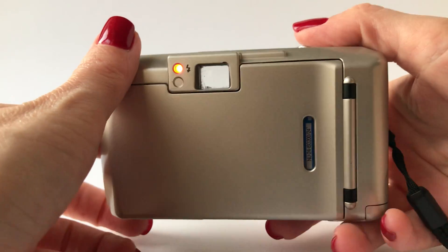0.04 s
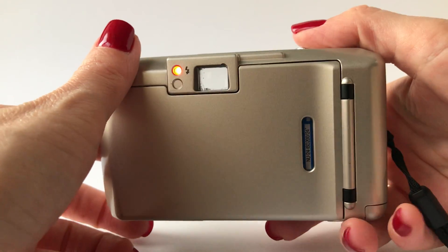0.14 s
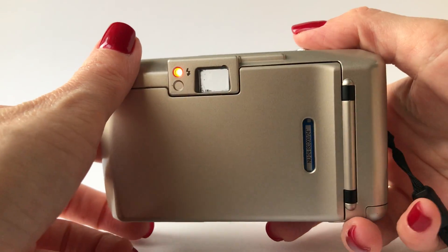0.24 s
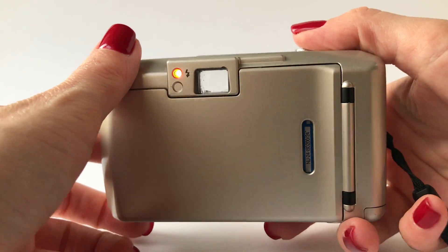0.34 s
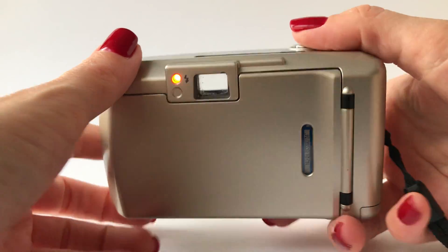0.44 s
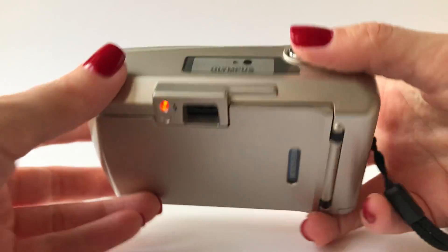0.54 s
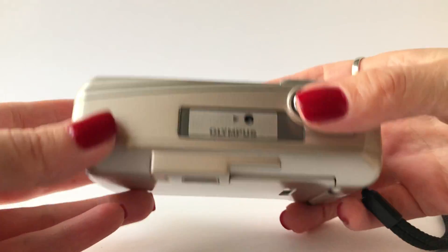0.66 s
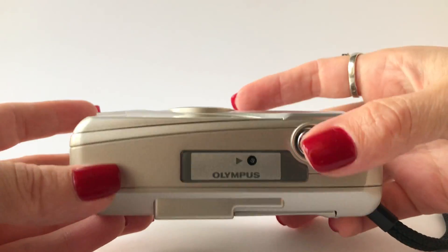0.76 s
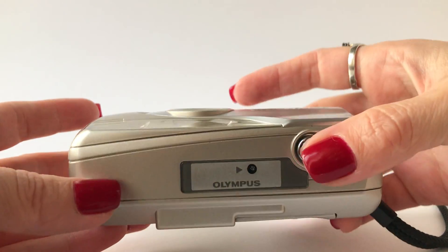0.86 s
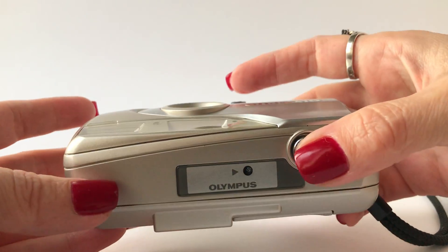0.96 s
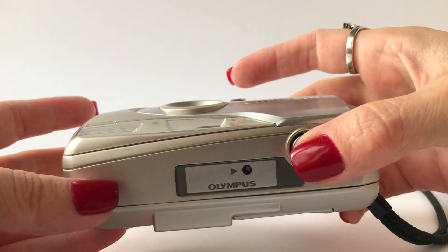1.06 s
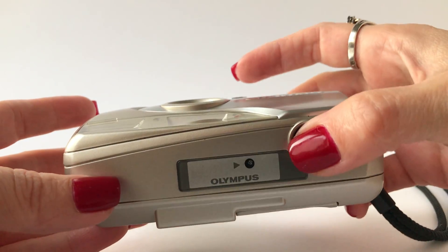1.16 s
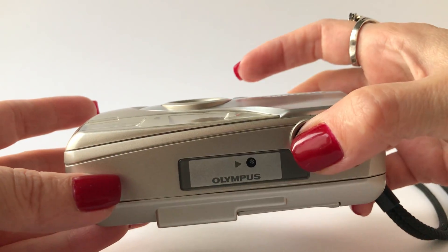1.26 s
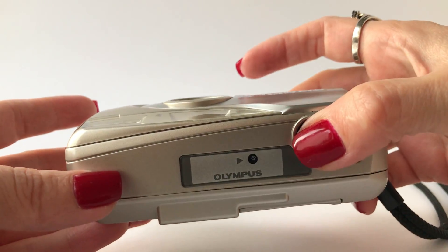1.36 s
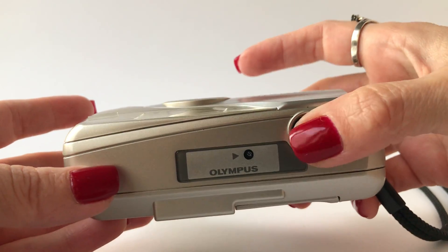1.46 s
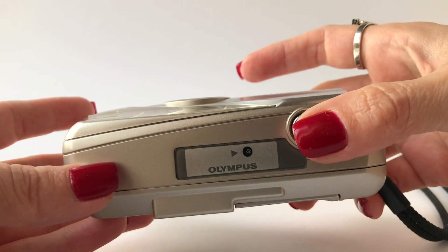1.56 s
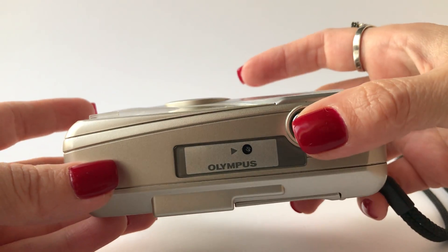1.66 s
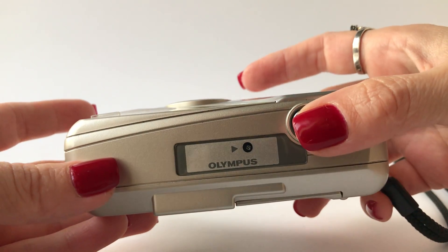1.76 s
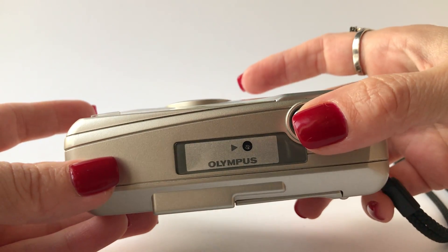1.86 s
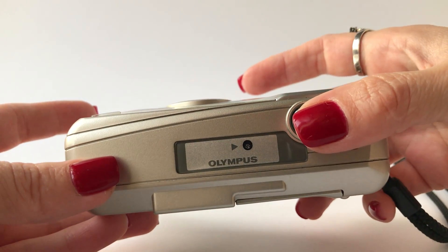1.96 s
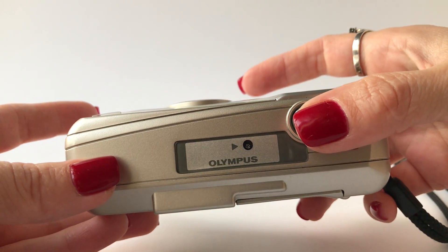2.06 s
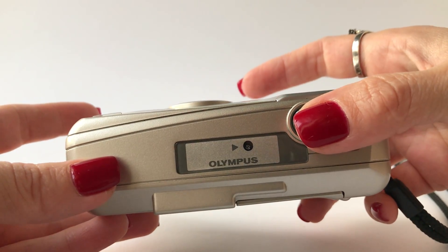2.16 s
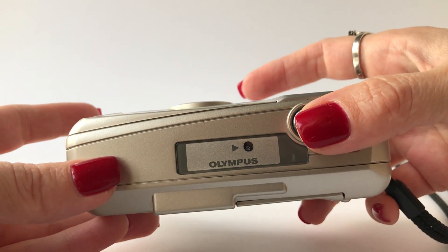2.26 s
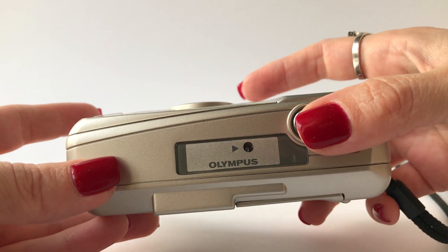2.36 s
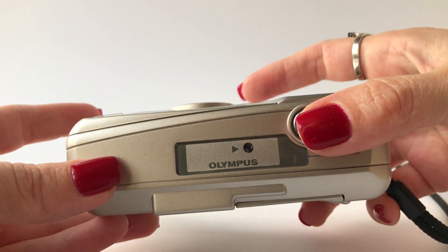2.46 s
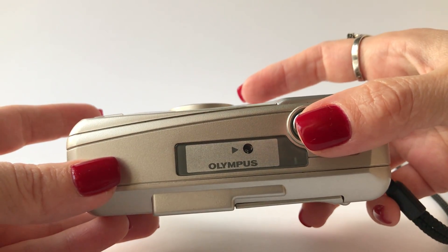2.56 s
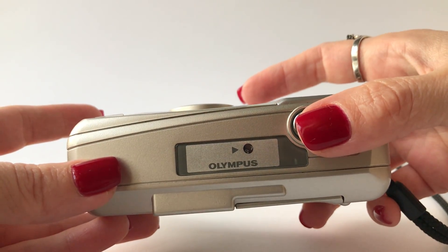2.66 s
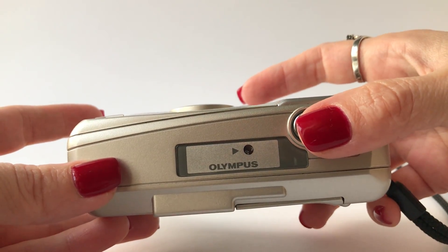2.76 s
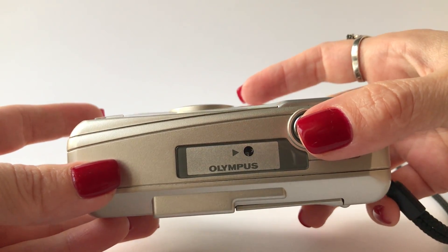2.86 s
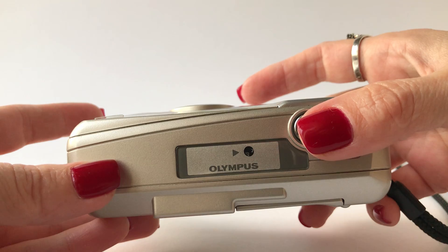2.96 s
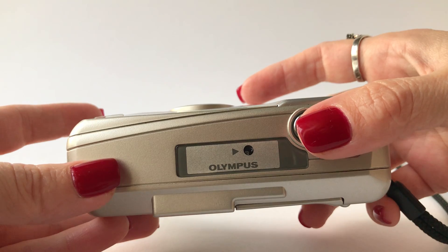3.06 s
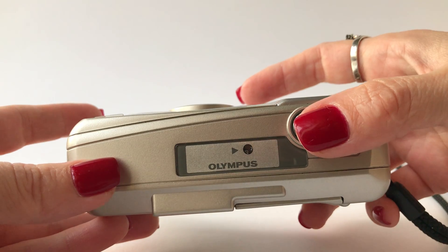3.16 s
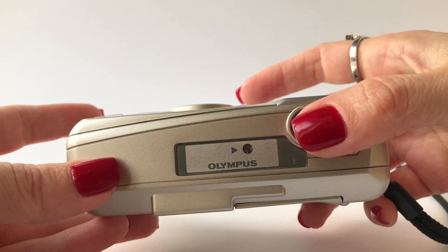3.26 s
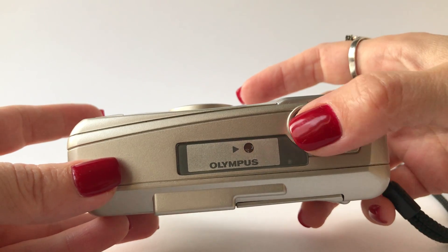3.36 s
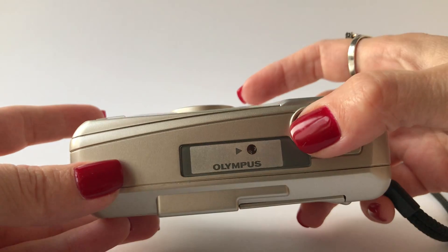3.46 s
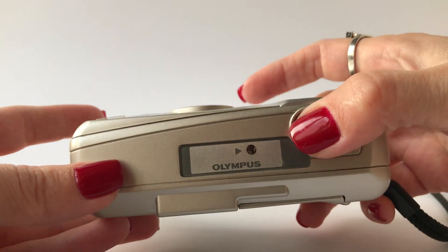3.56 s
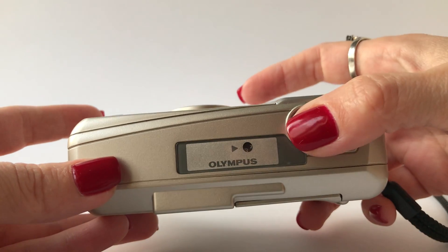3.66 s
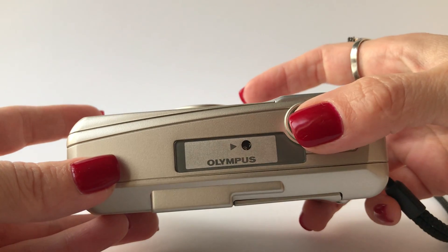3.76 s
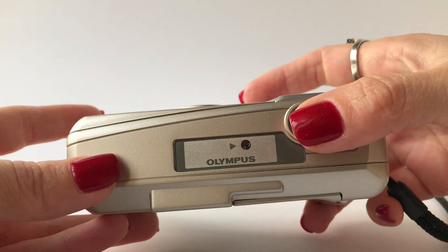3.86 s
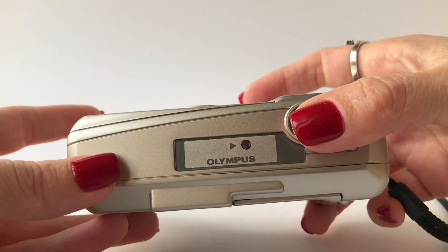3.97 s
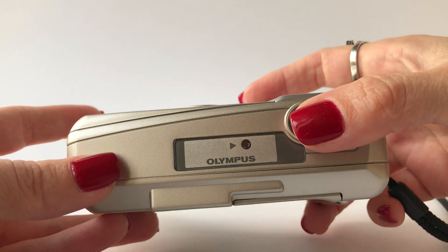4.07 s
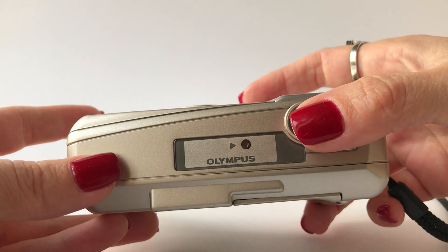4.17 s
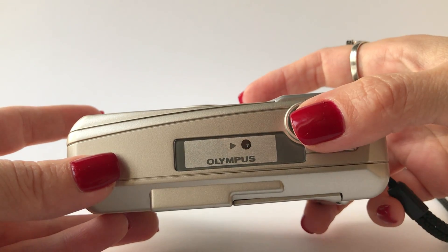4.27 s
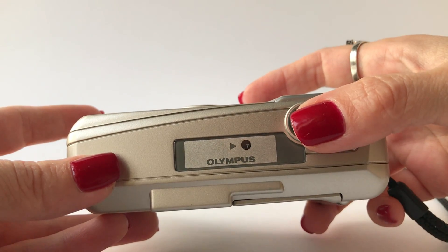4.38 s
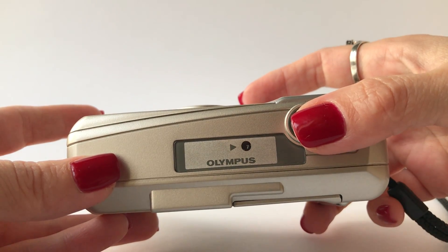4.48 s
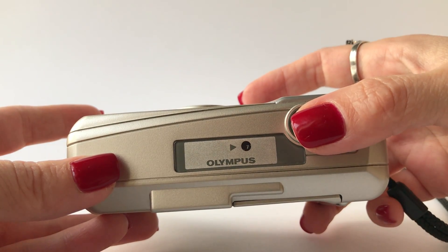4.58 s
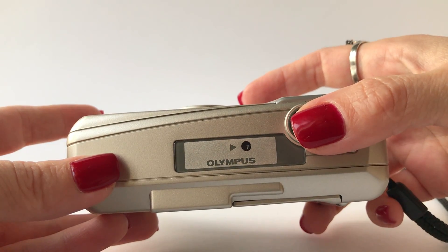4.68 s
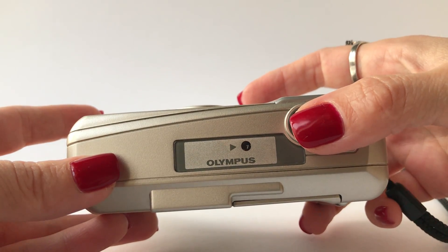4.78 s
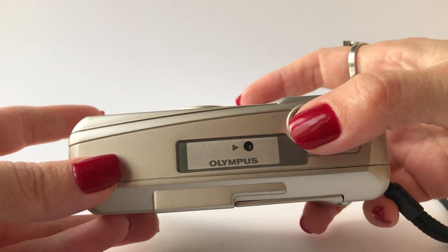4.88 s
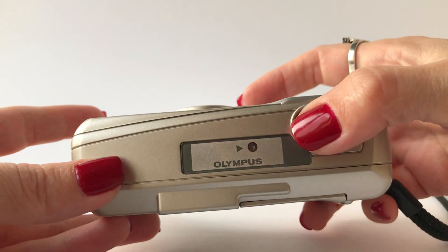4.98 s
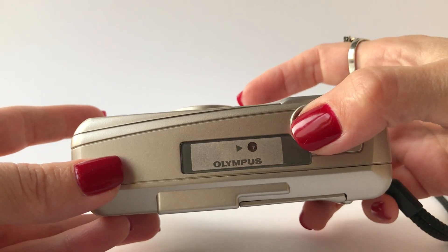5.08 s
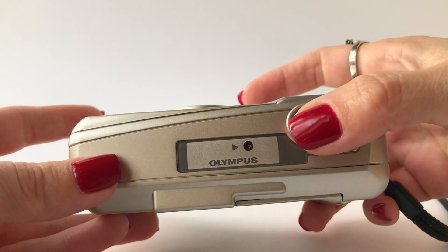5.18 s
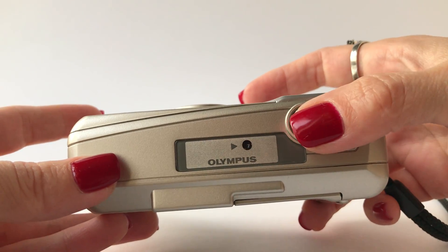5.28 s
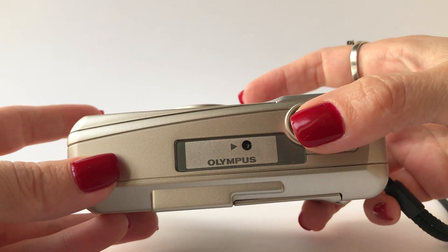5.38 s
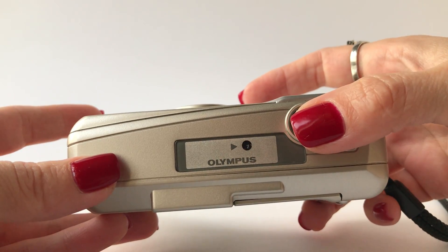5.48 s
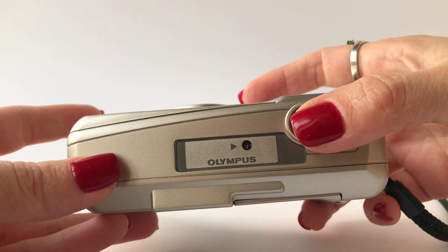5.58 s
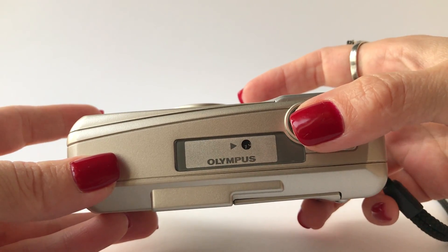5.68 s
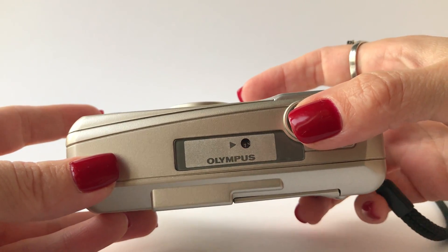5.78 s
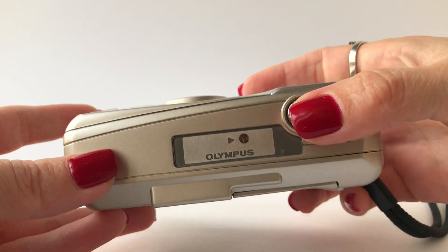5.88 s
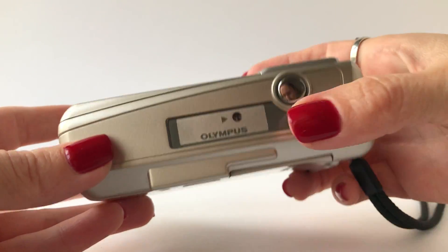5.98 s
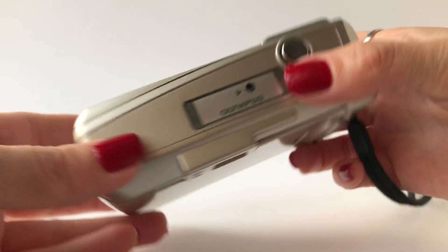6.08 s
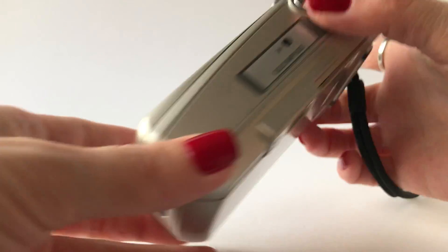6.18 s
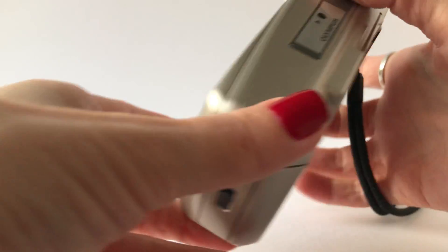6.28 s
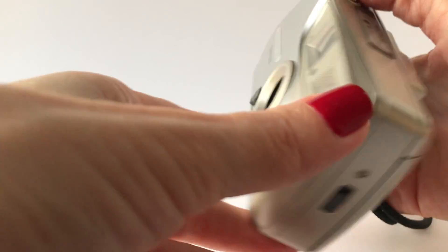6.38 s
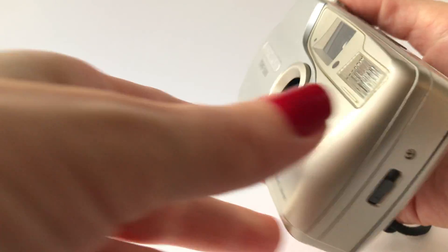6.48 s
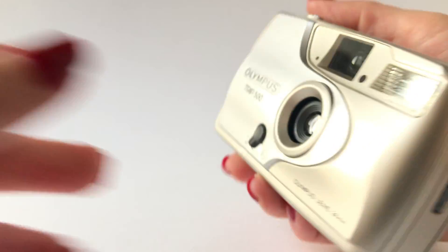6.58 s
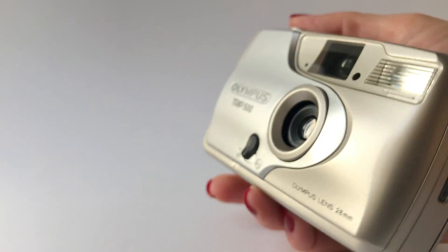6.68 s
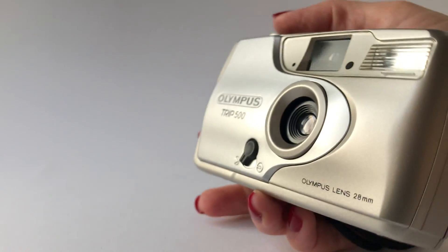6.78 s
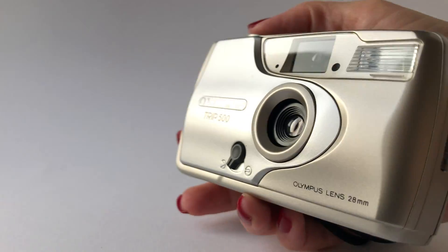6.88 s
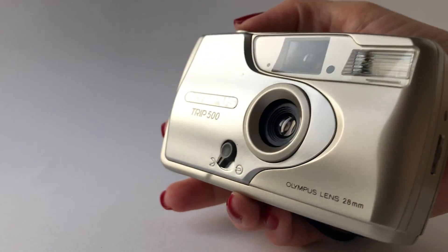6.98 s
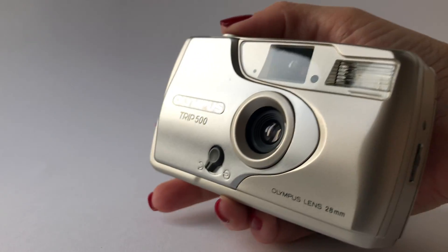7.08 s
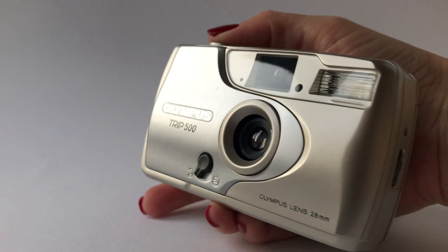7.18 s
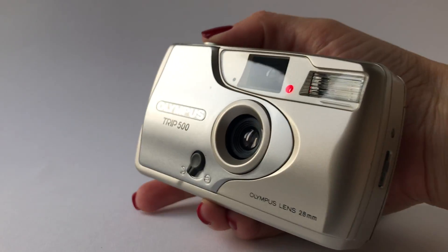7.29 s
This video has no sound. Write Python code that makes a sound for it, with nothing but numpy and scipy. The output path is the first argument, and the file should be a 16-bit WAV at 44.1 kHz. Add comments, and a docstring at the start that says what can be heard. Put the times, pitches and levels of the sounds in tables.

```python
"""In a small, quiet room, a compact film camera held close to the microphone is fired twice.
Shutter, pawls and film strike the plastic shell: modes ring under short bursts of contact noise.
A geared motor winds in three runs: shaft harmonics, a tooth-mesh tone and rattling noise.
A rising sine is the flash recharging; shaped noise is fingers sliding and tapping on the shell.
Behind it lie filtered air noise, the beating low drone of an appliance and faint treble ticks."""
import sys
import numpy as np
from scipy import signal
from scipy.fft import rfft, irfft
from scipy.io import wavfile
from scipy.ndimage import uniform_filter1d

SR = 44100
rng = np.random.default_rng(int(sys.argv[2]) if len(sys.argv) > 2 else 0)


def int16_out(signal):
    """Quantize to a 16-bit WAV file."""
    q = np.round(np.clip(np.atleast_2d(signal).T, -1, 1) * 32767)
    wavfile.write(sys.argv[1], SR, q.astype(np.int16))


N = 323694
TIME = np.arange(N) / SR

# The motor winds the film. Each row: start in seconds, stop in seconds, free shaft speed in Hz,
# stretch of the closing sequence (factor), extra metal snap of that sequence in dB.
WINDING_RUNS = [(1.632, 2.647, 239.9, 1.044, 0), (3.848, 4.4045, 237.9, 1.0, 0),
                (5.339, 5.879, 240.3, 0.96, 0)]
# Colour of the dull rustle and of the faint hiss. Each row: frequency in Hz, relative level in dB.
RUSTLE_COLOUR = [(600, -8), (1500, -1.5), (4400, -6.5), (6500, -14.5), (16000, -8.5)]


def undb(db):
    """Turn decibels into gain."""
    return 10 ** (np.asarray(db) / 20)


def unit(x):
    """Scale to rms 1."""
    return x / np.sqrt(np.mean(x ** 2))


def add(out, s, x):
    """Mix x into out from s seconds on."""
    i = max(int(s * SR), 0)
    out[i:i + len(x)] += x[:N - i]


def band(x, lo_hz, hi_hz):
    """Causal band-pass."""
    return signal.sosfilt(signal.butter(3, [lo_hz, hi_hz], "band", fs=SR, output="sos"), x)


def colour(x, points):
    """Filter by an outline of (Hz, dB) points, then scale to rms 1."""
    hz, db = np.transpose(points)
    f = np.maximum(np.fft.rfftfreq(len(x), 1 / SR), 1)
    outline_db = np.interp(np.log(f), np.log(hz), db)
    return unit(irfft(rfft(x) * undb(outline_db), len(x)))


def walk(rate_hz, size=N):
    """Smooth random wandering of rms about 1, with a new random target at the given rate."""
    hold = max(int(SR / rate_hz), 1)
    steps = np.repeat(rng.standard_normal(size // hold + 1), hold)
    return unit(uniform_filter1d(steps, hold)[:size])


def gate(full, stop, rise, fall):
    """Ramp up over rise seconds to full level at time full, then die away after stop."""
    return np.clip((TIME - full) / rise + 1, 0, 1) * np.exp(-np.maximum(TIME - stop, 0) / fall)


def swell(s, rise, fall):
    """A smooth hump of height 1 at time s."""
    return np.exp(-.5 * ((TIME - s) / np.where(TIME < s, rise, fall)) ** 2)


def strike(lo_hz, hi_hz, contact_s, crack_db, rise_s, sheen=0.0):
    """One register of a blow: body modes ring, the contact chatters and leaves a faint diffuse tail."""
    # Modes of the shell and its levers. Each row: frequency in Hz, relative level in dB, t60 in seconds.
    body_modes = [(599, 1, 0.055), (694, 0, 0.034), (790, -5, 0.0071), (885, -4.5, 0.07), (982, -3, 0.054),
                  (1285, -4, 0.032), (1313, -5, 0.032), (1630, -5.5, 0.023), (1780, -7.5, 0.023),
                  (2205, -1.5, 0.019), (2414, -2.5, 0.021), (2750, -2, 0.024), (3084, -3.5, 0.028),
                  (3854, -2.5, 0.022), (5820, -2, 0.022), (7700, -1, 0.014), (8650, 0, 0.017),
                  (11080, -5, .01), (13500, -8.5, .008), (15500, -2, .008)]
    scatter_db, tail_db, tail_s = -1.0, -32, 0.028
    t = np.arange(SR // 5) / SR
    hz, db, t60 = np.transpose(body_modes)[:, :, None]
    detune, size, angle = rng.standard_normal((len(body_modes), 3)).T[:, :, None]
    inside = 1 / (1 + (lo_hz / hz) ** 8 + (hz / hi_hz) ** 8)
    rings = np.sin(2 * np.pi * (hz * (1 + 0.013 * detune) * t + angle)) * np.exp(-np.log(1000) * t / t60)
    modes = np.sum(inside * undb(db + scatter_db * size) * rings, axis=0)
    decay = np.exp(-t / contact_s) + undb(tail_db) * np.exp(-t / tail_s)
    chatter = rng.standard_normal(len(t)) * decay
    crack = band(chatter - sheen * np.roll(chatter, 1), lo_hz, hi_hz)  # harder edges favour the top
    onset = 1 - np.exp(-(t / rise_s) ** 2)
    blow = (unit(modes) + undb(crack_db) * unit(crack)) * onset
    return blow / np.sqrt(np.sum(blow ** 2) / (SR / 1000))  # energy of 1 ms at full scale


def clicks(blows, thud_db, ring_db, snap_db, crack_db, rise_s, thud_hz, ring_hz, sheen):
    """Sprung levers hit their stops: the shell thuds, the levers ring, the metal edges snap."""
    out = np.zeros(N)
    for s, db, thud, snap, contact_s in blows:
        blow = undb(thud + thud_db) * strike(*thud_hz, contact_s, crack_db=-7.5, rise_s=rise_s)
        blow += undb(ring_db) * strike(*ring_hz, contact_s, crack_db, rise_s)
        blow += undb(snap + snap_db) * strike(3500, 17000, contact_s, crack_db=11, rise_s=rise_s, sheen=sheen)
        add(out, s, undb(db) * blow)
    return out


def shutter():
    """At each shot the latch trips and the sprung blades open, bounce, close and rebound."""
    # Each row: time in seconds, level in dB, extra shell thud in dB, extra metal snap in dB.
    shots = [(3.5181, 0, 2, 0), (5.0264, -0.5, -2, 1)]
    # Latch, blades opening, two bounces, blades closing, rebound. Each row: time relative to the shot
    # in seconds (negative is before it), blow level in dB, relative shell thud in dB,
    # relative metal snap in dB, contact decay in seconds.
    blade_blows = [(-.0013, -30, -20, -12.5, 0.001), (0, -10, -24.5, -12.5, 0.0014),
                   (.0028, -25, -16, -3, .002), (.0058, -24, -6.5, -2, 0.0038),
                   (0.0119, -17, -14, -2, .0017), (.025, -21.5, -18, -3, .0024)]
    blows = [(s + offset, db + level, thud + more_thud, snap + more_snap, contact_s)
             for s, db, more_thud, more_snap in shots
             for offset, level, thud, snap, contact_s in blade_blows]
    return clicks(blows, thud_db=-2.0, ring_db=-5.5, snap_db=-1, crack_db=6.5, rise_s=.0006,
                  thud_hz=(659, 1298), ring_hz=(1530, 2884), sheen=0.098)


def shaft_speed(start, stop, free_hz):
    """Turns per second: the motor spins up, follows the pull of the film and sags under the cocking spring."""
    # The film runs slack or drags. Each row: time in seconds, rise in seconds, fall in seconds,
    # change of shaft speed in Hz.
    film_pull = [(1.809, .07, .035, 15), (2.19, .095, .055, -11.5)]
    start_share, spin_up_s = .58, .04
    cocking_s, cocking_ramp_s, cocking_sag_hz = .2, .05, 4.6
    spin_up = 1 - (1 - start_share) * np.exp(-np.maximum(TIME - start, 0) / spin_up_s)
    film = sum(change * swell(s, rise, fall) for s, rise, fall, change in film_pull)
    cocking = np.clip((TIME - stop + cocking_s) / cocking_ramp_s, 0, 1)
    return free_hz * spin_up + film - cocking_sag_hz * cocking


def motor():
    """A small motor drives gears: shaft harmonics, a nine-tooth mesh tone, and teeth that rattle once a turn."""
    # Partials of the whine. Each row: multiple of shaft speed, relative level in dB.
    gear_orders = [(3, -12), (4, -14.5), (5, -2), (6, -3), (7, -11.5), (8, -12.5), (12, -8.5), (13, -15),
                   (14, -14), (15, -8), (16, -26), (17, -19), (18, -9), (19, -14), (20, -13), (21, -24),
                   (24, -17), (25, -34), (26, -30), (27, -18.5), (35, -31), (36, -19.5)]
    # Colour of the gear rattle. Each row: frequency in Hz, relative level in dB.
    rattle_colour = [(130, -44.5), (240, -1.5), (400, -13), (650, 2.5), (950, -3.5), (1350, 1.5),
                     (2000, -8.5), (3000, -8), (4500, -1.5), (5400, -13), (6400, -3), (7700, -14.5),
                     (8800, -6), (10300, -15.5), (16000, -14)]
    # Shell resonances that lift the mesh tone. Each row: centre in Hz, half width in Hz, lift in dB.
    shell_resonances = [(1950, 52, 4.5), (2152, 17.4, 7)]
    gears_db, mesh_db, whine_db, throb_db = -51.5, -58, -1, -14
    flutter_db, throb_scatter_db, grain_db = 1.2, 3, 1.0
    strain_db, strain_s, settle_s = 4.0, 0.07, .04
    drift, wobble, judder_depth = 0.0018, 0.0012, 0.0693  # shares of the shaft speed
    bite, lean, lean_twice = 0.18, 0.2, 0.1
    out = np.zeros(N)
    for start, stop, free_hz, *_ in WINDING_RUNS:
        running = gate(start, stop, rise=.01, fall=0.024)
        on = running > 1e-3
        hz = (shaft_speed(start, stop, free_hz) * (1 + drift * walk(14)))[on]
        size = len(hz)
        # the shaft judders and the gears strain while they take up the load, then settle
        load_db = gears_db + strain_db * np.exp(-(TIME[on] - start) / strain_s)
        judder = judder_depth * np.exp(-(TIME[on] - start) / settle_s)
        uneven_hz = hz * (1 + wobble * walk(90.6, size) + judder * walk(350, size))
        turn = 2 * np.pi * np.cumsum(uneven_hz) / SR
        whine = 0
        for order, db in gear_orders:
            partial = np.sin(order * turn + 2 * np.pi * rng.random())
            whine += undb(db + whine_db + flutter_db * walk(110.1, size)) * partial
        # an off-centre wheel makes one high partial throb every ninth turn
        throb = (1 + np.cos(turn / 9)) * np.sin(22 * turn)
        whine += undb(throb_db + throb_scatter_db * walk(200, size)) * throb
        # the mesh tone swells where it meets a resonance of the shell
        lift_db = sum(lift / (1 + ((9 * hz - centre) / width) ** 2) for centre, width, lift in shell_resonances)
        mesh = undb(mesh_db + lift_db + .5 * walk(60, size)) * np.sin(9 * turn)
        # teeth strike hardest once a turn, and a slower wheel leans on them every third turn
        contact = np.exp(bite * np.cos(turn) + lean * np.cos(turn / 3) + lean_twice * np.cos(2 * turn / 3))
        grains = rng.standard_normal(size) * contact * undb(grain_db * walk(1500, size))
        teeth = colour(grains, rattle_colour)
        # a slow motor grinds more than it sings
        speed = hz / 238
        gears = np.sqrt(2) * speed ** 3 * whine + speed ** 2.4 * teeth
        out[on] += running[on] * (np.sqrt(2) * mesh + undb(load_db) * gears)
    return out


def pawls():
    """Sprung pawls and levers click home at the end of each run; film, counter and button click singly."""
    # Clicks of film, counter and button. Each row: time in seconds, blow level in dB,
    # relative shell thud in dB, relative metal snap in dB, contact decay in seconds.
    single_clicks = [(1.8114, -34, -3, -13, 0.0014), (1.9016, -25, -10, -5.5, 0.0024),
                     (2.1822, -31, -27, -12, 0.001), (2.8134, -62, -13, 1, 0.0017),
                     (3.8106, -39.5, -14, -12.5, 0.00039), (5.2983, -48.5, -11, -11, 0.0017),
                     (6.0177, -41.5, -23, -4.5, 0.00098)]
    # Counter pawl, its return, cocking lever, stop pawl. Each row: time relative to the stop in seconds,
    # negative meaning before it (before stretching), then the same last four columns as above.
    closing_blows = [(-.104, -25.5, -21.5, -3.5, 0.0027), (-.0833, -31.5, -10.5, -1, 0.0023),
                     (-.0347, -24.5, -16, 0, .0021), (0, -20.5, -14.5, -0.5, 0.0013)]
    closing = [(stop + stretch * offset, level, thud, snap + more_snap, contact_s)
               for _, stop, _, stretch, more_snap in WINDING_RUNS
               for offset, level, thud, snap, contact_s in closing_blows]
    return clicks(single_clicks + closing, thud_db=1.5, ring_db=-4.5, snap_db=2.0, crack_db=3.0, rise_s=0.00083,
                  thud_hz=(534, 1070), ring_hz=(1120, 4330), sheen=0.64)


def knocks(tick_db=-8):
    """The film tugs at its spool, which bumps the shell."""
    # Dull knocks during winding. Each row: time in seconds, level in dB.
    spool_bumps = [(1.692, -37), (1.713, -35.5), (1.733, -42), (1.77, -34.5), (1.79, -33.5), (1.838, -44),
                   (1.875, -36), (2.302, -38), (2.467, -33.5), (2.542, -36), (4.058, -38), (4.166, -40),
                   (4.2275, -31), (4.305, -34), (4.328, -36.5), (5.711, -33), (5.735, -46), (5.784, -36.5)]
    out = np.zeros(N)
    for s, db in spool_bumps:
        bump = band(strike(487, 1000, contact_s=0.0034, crack_db=-5.5, rise_s=0.00087), 250, 4000)
        tick = strike(1650, 8400, contact_s=0.0038, crack_db=32, rise_s=.0007)
        add(out, s, undb(db) * (bump + undb(tick_db) * tick))
    return out


def spring(hz=1265, t60=1.0, db=-63):
    """A small coil spring sings on after the winding stops."""
    t = np.arange(SR) / SR
    out = np.zeros(N)
    for _, stop, *_ in WINDING_RUNS:
        add(out, stop, undb(db) * np.sin(2 * np.pi * hz * t) * np.exp(-np.log(1000) * t / t60))
    return out


def flash(db=-66):
    """The flash transformer's whistle climbs ever more slowly as its capacitor fills."""
    full_s, stop_s = 4.55, 4.93
    full_hz, climb_hz_per_s, slowing_s = 11800, 11400, 1.8  # pitch and climb at full_s
    charge = 1 - np.exp(-(TIME - full_s) / slowing_s)
    hz = np.clip(full_hz + climb_hz_per_s * slowing_s * charge, 0, SR / 2)
    level = gate(full_s, stop_s, rise=.06, fall=.012)
    return undb(db) * level * np.sin(2 * np.pi * np.cumsum(hz) / SR)


def fingers(grain_db=3.0, slip_db=1.0, catch_db=3.5):
    """Skin slides over the plastic in many tiny, uneven slips; the palm adds a duller rustle."""
    # Strokes on the shell. Each row: time of the peak in seconds, rise in seconds, fall in seconds,
    # level in dB, relative palm rustle in dB.
    strokes = [(.015, 0.034, 0.034, -59, -10), (.31, 0.038, 0.014, -65, -26), (.54, .04, .04, -72, -1),
               (.69, 0.041, 0.093, -60, -6), (.865, 0.014, 0.0061, -66.5, -16), (.99, 0.017, .07, -69, -9),
               (1.27, .05, .02, -73.5, 3.5), (1.605, .02, 0.015, -71, 1.5), (3.485, .015, .006, -65, -3.5),
               (4.995, 0.0043, 0.0045, -69, 9), (6.229, 0.047, 0.13, -50.5, -12.5),
               (6.455, 0.021, 0.025, -58.5, -1), (6.7, 0.037, 0.072, -68.5, -0.5),
               (6.9, 0.043, 0.2, -69.5, 2)]
    # Colour of the rubbing. Each row: frequency in Hz, relative level in dB.
    skin_colour = [(710, -15), (1200, -7.5), (2060, -28), (2350, -13), (3790, -13.5), (4500, -11.5),
                   (6800, -4.5), (8440, -8.5), (9310, -9.5), (14000, -9.5), (16000, -4.5)]
    unevenness_db = grain_db * walk(2500) + slip_db * walk(160)
    slips = colour(rng.standard_normal(N) * undb(unevenness_db), skin_colour)
    palm = colour(rng.standard_normal(N) * undb(catch_db * walk(130)), RUSTLE_COLOUR)
    return sum(undb(db) * swell(s, rise, fall) * (slips + undb(dull) * palm)
               for s, rise, fall, db, dull in strokes)


def taps(trim_db=-2, decay_s=0.002, scuff_db=-1, rise_s=0.00089):
    """A soft contact rings one patch of the shell, with a little scuff around that pitch."""
    # Fingertips, and gears taking up slack. Each row: time in seconds, level in dB before the trim,
    # ring in Hz.
    soft_contacts = [(0.67, -40, 564), (0.67, -50, 1120), (1.212, -61, 2220), (1.245, -53, 1030),
                     (1.29, -47, 1270), (1.543, -52.5, 1360), (1.627, -39, 1280), (1.649, -34, 1160),
                     (1.661, -35, 1100), (1.944, -42, 2777), (3.8467, -34, 1250), (5.341, -37.5, 1320),
                     (5.993, -43.5, 1400), (6.12, -56, 1370), (6.142, -46, 1400), (6.197, -48, 1590),
                     (6.234, -61, 2400), (6.246, -44, 750), (6.295, -48, 3030), (6.447, -38, 2820),
                     (6.448, -45, 1250), (6.826, -43.5, 1310), (6.835, -48, 2430)]
    t = np.arange(SR // 20) / SR
    envelope = np.exp(-t / decay_s) * (1 - np.exp(-t / rise_s))
    out = np.zeros(N)
    for s, db, hz in soft_contacts:
        scuff = unit(band(rng.standard_normal(len(t)), hz / 2, 2 * hz))
        ring = np.sqrt(2) * np.sin(2 * np.pi * hz * t)
        add(out, s, undb(db + trim_db) * (ring + undb(scuff_db) * scuff) * envelope)
    return out


def room(x, t60=0.31, wet_db=-18.0, early_db=-15, early_s=0.0068):
    """Quick reflections off the table and hands, then the short tail of a furnished room."""
    t = np.arange(SR // 2) / SR
    early = band(rng.standard_normal(len(t)), 300, 14000) * np.exp(-t / early_s) * (t > .002)
    tail = band(rng.standard_normal(len(t)), 200, .48 * SR) * np.exp(-np.log(1000) * t / t60)
    tail *= np.minimum(t / 0.025, 1)  # the tail builds up
    response = (undb(early_db) * unit(early) + undb(wet_db) * unit(tail)) / np.sqrt(len(t))
    return x + signal.fftconvolve(x, response)[:N]


def ticks(db=-66, scatter_db=3, decay_s=0.001, lo_hz=9000):
    """Tiny, evenly spaced treble ticks of uneven strength: short bursts of high noise."""
    first_s, period_s = .054, .1024
    t = np.arange(SR // 100) / SR
    out = np.zeros(N)
    for s in np.arange(first_s, N / SR, period_s):
        tick = unit(band(rng.standard_normal(len(t)), lo_hz, 16000)) * np.exp(-t / decay_s)
        add(out, s, undb(db + scatter_db * rng.standard_normal()) * tick)
    return out


def room_air(db=-66.0):
    """The air of the room: broad noise, strongest in the bass, that wanders slightly in level."""
    # Each row: frequency in Hz, relative level in dB.
    air_colour = [(25, -7), (70, -1.5), (110, -5.5), (250, -6.5), (400, -10.5), (520, -15), (660, -9),
                  (850, -13), (1150, -15), (1500, -20.5), (3000, -25.5), (5500, -30), (10000, -33.5),
                  (16000, -28.5)]
    air = colour(band(rng.standard_normal(N), 60, .48 * SR), air_colour)
    return air * undb(db + 0.3 * walk(2.24))


def faint_hiss(db=-67, full_s=6.96, rise_s=0.55):
    """A faint noise sets in as the camera is turned round, and reaches its level at full_s."""
    level = undb(db) * np.clip((TIME - full_s) / rise_s + 1, 0, 1)
    return colour(rng.standard_normal(N), RUSTLE_COLOUR) * level


def appliance(trim_db=-4):
    """An appliance drones far off: two close low tones beat against each other under weaker tones."""
    # The weaker tones. Each row: frequency in Hz, level in dB before the trim.
    weak_tones = [(99, -75), (195, -78), (393, -76), (490, -76.5), (635, -76), (684, -74), (1050, -75.5),
                  (1125, -78.5)]
    drone_hz, drone_db = 49.1, -66.5
    beat_hz, beat_db, dip_s = .617, -4.5, 2.55  # second tone: offset, relative level, time of a dip
    phase = 2 * np.pi * drone_hz * TIME + 0.14 * walk(3.5)
    second = np.sin(phase + 2 * np.pi * beat_hz * (TIME - dip_s))
    drone = undb(drone_db) * (np.sin(phase) - undb(beat_db) * second)
    tones = sum(undb(db + trim_db + 2 * walk(11.0)) * np.sin(2 * np.pi * hz * TIME + 0.62 * walk(9))
                for hz, db in weak_tones)
    return np.sqrt(2) * (drone + tones)


def scene():
    """The camera sounds in the room; whistle, ticks and background are added without reflections."""
    camera = shutter() + pawls() + taps() + knocks() + motor() + spring() + fingers()
    background = room_air() + faint_hiss() + appliance()
    return (room(camera) + flash() + ticks() + background)[None]


def record(dry):
    """The recorder cuts the top with a steep low-pass."""
    top_hz = 16000
    return signal.sosfilt(signal.ellip(10, .2, 70, top_hz, fs=SR, output="sos"), dry)


dry = scene()
out = record(dry)
int16_out(out)
```